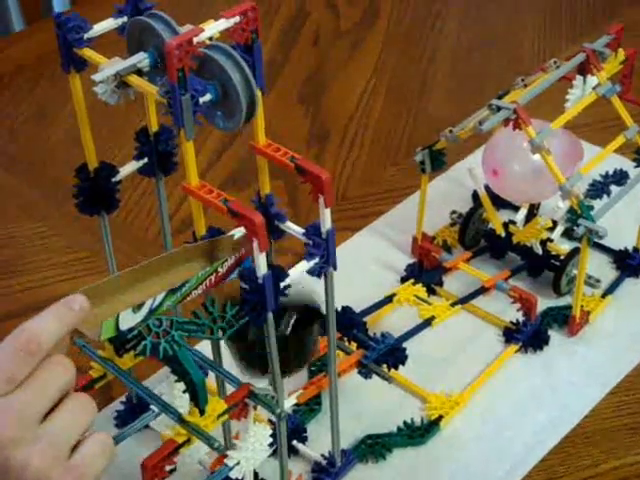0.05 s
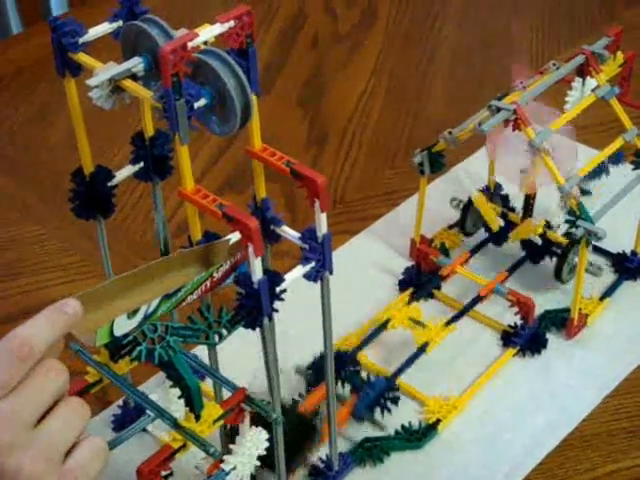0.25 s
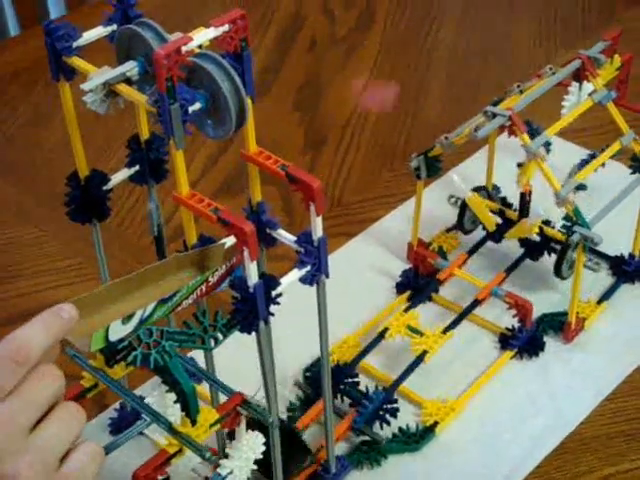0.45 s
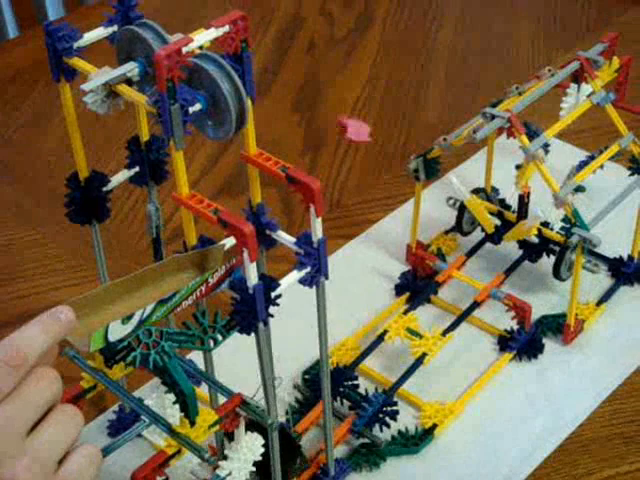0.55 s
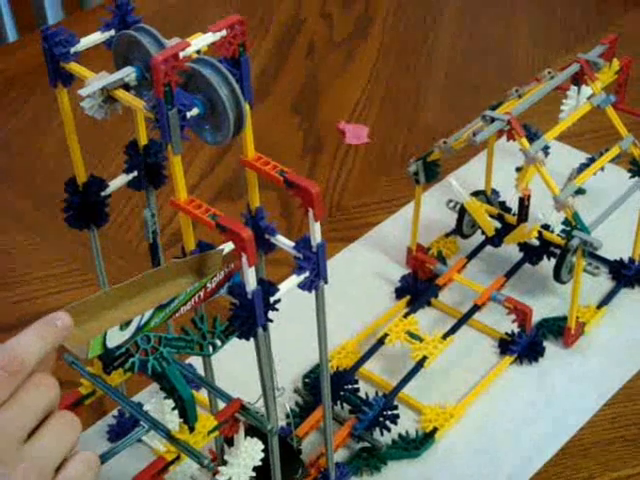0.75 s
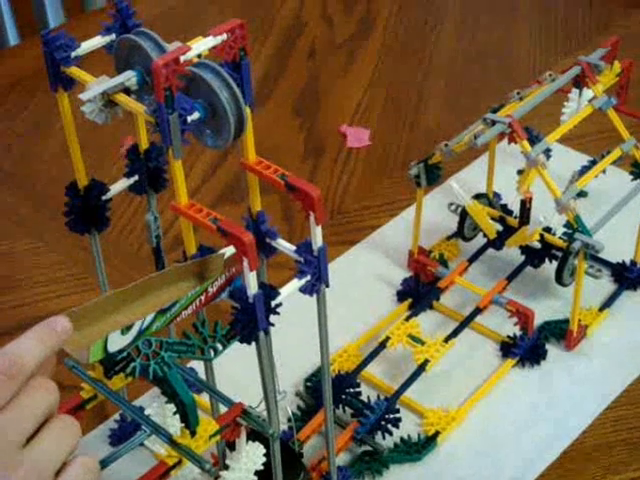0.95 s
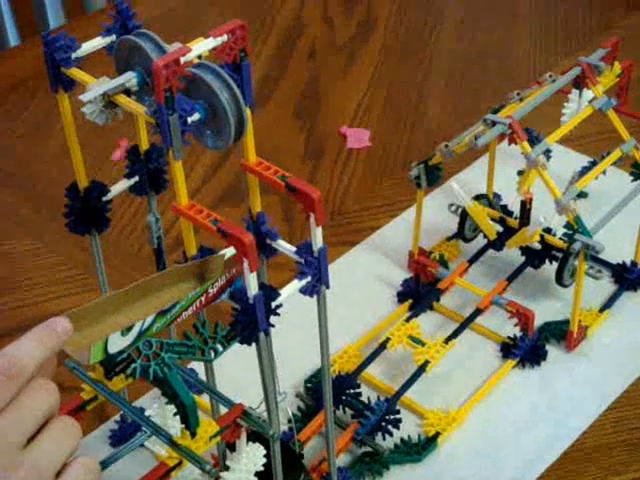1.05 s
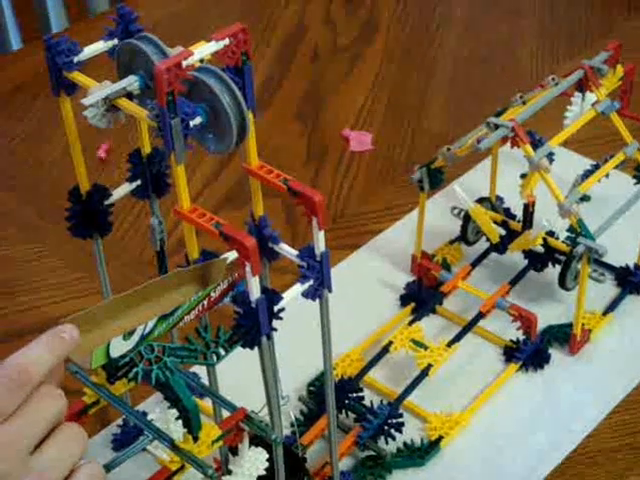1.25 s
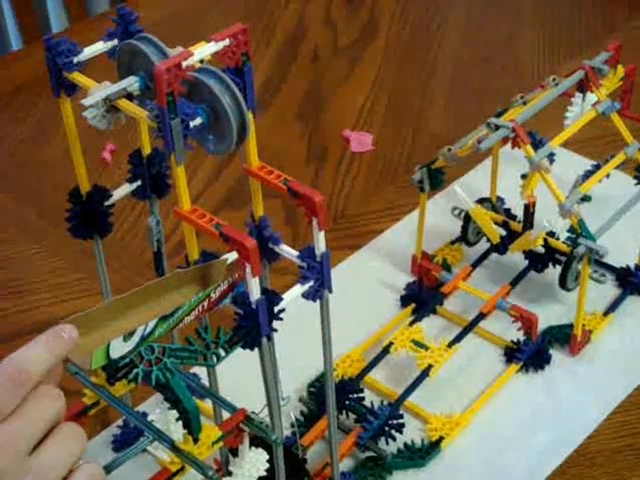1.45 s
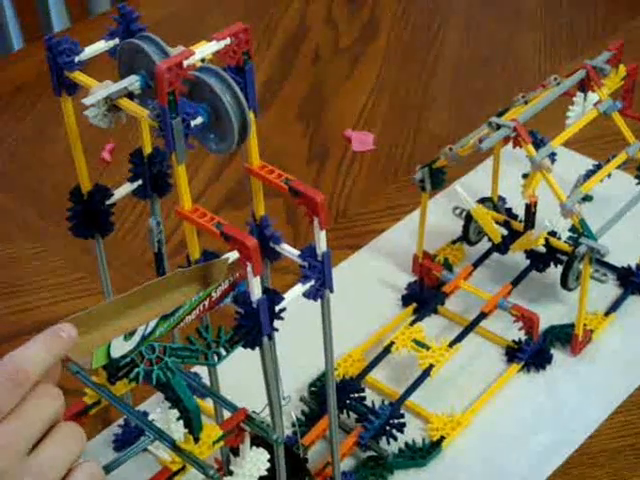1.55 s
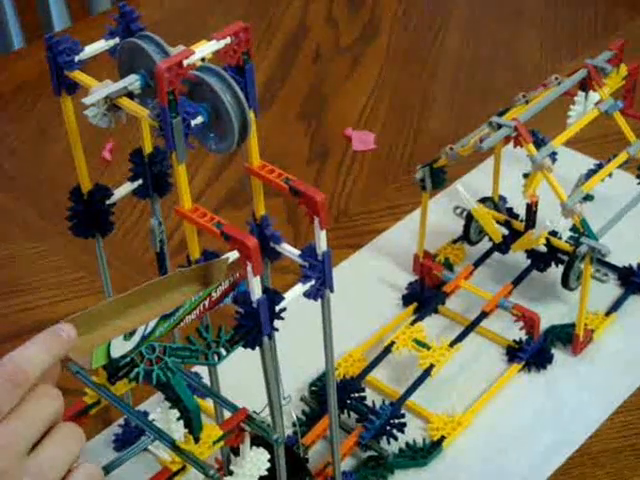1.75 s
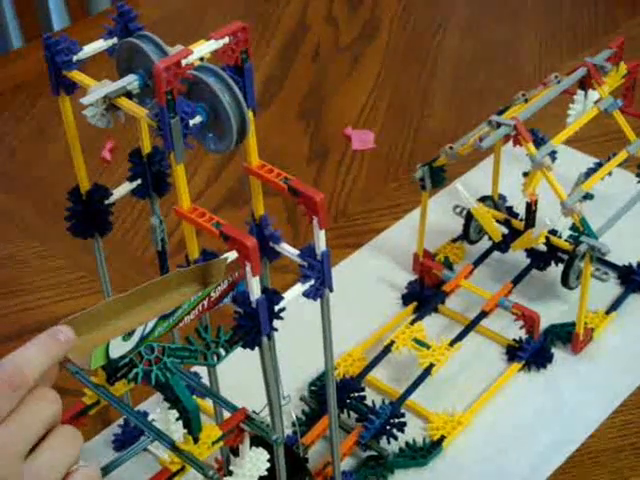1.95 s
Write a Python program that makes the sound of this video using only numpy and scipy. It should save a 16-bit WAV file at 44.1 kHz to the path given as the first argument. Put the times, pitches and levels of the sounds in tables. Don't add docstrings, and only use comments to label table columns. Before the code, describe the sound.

A small balloon bursts with a loud pop after a plastic bucket clatters down in a room

```python
import sys
import numpy as np
from scipy import signal
from scipy.fft import rfft, irfft, next_fast_len
from scipy.io import wavfile
from scipy.ndimage import uniform_filter1d

SR = 44100
rng = np.random.default_rng(int(sys.argv[2]) if len(sys.argv) > 2 else 0)


def rack_gain(trim_db):
    fader = np.asarray(trim_db, float)
    return 10 ** (fader / 20)


def output_pcm(signal):
    pcm = np.clip(np.atleast_2d(signal).T, -1, 1) * 32767
    wavfile.write(sys.argv[1], SR, np.round(pcm).astype(np.int16))


N = 88200
LOW_CUT_HZ = 450
WALL_S = 0.003
THUD_DB = -39.5
CRASH_RISE_S = 0.0025


def seconds(n):
    return np.arange(n) / SR


def noise(n):
    return rng.standard_normal(n)


def unit(x):
    return x / np.sqrt(np.mean(x ** 2) + 1e-20)


def along(points, hz):
    f, v = np.transpose(points)
    return np.interp(np.log(hz + 1), np.log(f + 1), v)


def filtered(x, response):
    m = next_fast_len(len(x) + 8192)
    hz = np.fft.rfftfreq(m, 1 / SR)
    return irfft(rfft(x, m) * response(hz), m)[:len(x)]


def coloured(x, points):
    return filtered(x, lambda hz: rack_gain(along(points, hz)))


def low_cut(x):
    return filtered(x, lambda hz: hz ** 2 / (hz ** 2 + LOW_CUT_HZ ** 2))


def narrow_noise(centre_hz, width_hz):
    return unit(filtered(noise(N), lambda hz: np.exp(-((hz - centre_hz) / width_hz) ** 2)))


def decay(t, t60_s):
    return rack_gain(-60 * t / t60_s)


def onset(t, rise_s):
    return 1 - np.exp(-t / rise_s)


def ring(modes, t, spread_db):
    total = np.zeros(len(t))
    for hz, db, t60_s in modes:
        level_db = db + spread_db * rng.standard_normal()
        total += rack_gain(level_db) * decay(t, t60_s) * np.sin(2 * np.pi * hz * t)
    return total


def add(track, start_s, sound):
    part = track[round(start_s * SR):][:len(sound)]
    part += sound[:len(part)]


# (frequency [Hz], t60 [s])
ROOM_T60 = [(150, 0.8), (400, 0.47), (1000, 0.58), (2500, 0.5), (6000, 0.55), (12000, 0.46)]


def tail():
    hz, t, z = signal.stft(noise(SR), SR, nperseg=256)
    t60_s = along(ROOM_T60, hz)[:, None]
    h = signal.istft(z * decay(t, t60_s), SR, nperseg=256)[1]
    return h / np.linalg.norm(h)


def room(x, wet_db):
    late = np.pad(x, (round(WALL_S * SR), 0))
    return x + rack_gain(wet_db) * signal.fftconvolve(late, tail())[:N]


# (frequency [Hz], level [dB])
AIR_COLOUR = [(20, -32), (60, -24), (118, -14), (190, -11.5), (280, -6), (900, -10), (3000, -19.5),
              (9000, -27), (13000, -27.5), (16000, -28.5)]
# (frequency [Hz], width [Hz], level [dB])
FRIDGE_LINES = [(128, 14, -53), (240.5, 8, -49.5), (332, 10, -59), (888, 8, -55.5)]


def air():
    air_db, fuzz = -44, 0.3
    z = signal.stft(noise(N + 512), nperseg=512)[2]
    patches = uniform_filter1d(rng.standard_normal(z.shape), 6, 0)
    patches = uniform_filter1d(patches, 10, 1)
    patchy = signal.istft(z * unit(rack_gain(unit(patches))), nperseg=512)[1][:N]
    out = rack_gain(air_db) * unit(coloured(patchy, AIR_COLOUR))
    for hz, width_hz, db in FRIDGE_LINES:
        tone = np.sin(2 * np.pi * hz * seconds(N))
        out += rack_gain(db) * (tone + fuzz * narrow_noise(hz, width_hz))
    return out


# (time [s], peak level [dB], treble [dB])
TICKS = [
    (.0003, -26, -10),
    (0.0136, -22.5, -10.5),
    (0.034, -24, -5),
    (.052, -27, -0.5),
    (.0664, -28, 0),
    (.0764, -31, 1.5),
    (.0868, -28, 0),
    (.1044, -37, -6),
    (.120, -51.5, 16.5),
    (.1324, -38, -5),
]
# (frequency [Hz], level [dB], t60 [s])
ROD = [(1436, 5.5, 0.011), (2290, -1, 0.019), (3650, 10.5, 0.0079), (4110, 10.5, 0.0073), (5380, 3, .006),
       (6660, -23, .006)]
# (time [s], level [dB])
RUMBLE = [
    (.05, -69),
    (.09, -43),
    (.135, -42),
    (0.192, -57),
]


def ticks():
    rise_s, crack_db, crack_t60_s = 0.001, -1.5, 0.026
    out, t = np.zeros(N), seconds(SR // 10)
    for start_s, db, treble_db in TICKS:
        crack = rack_gain(crack_db) * decay(t, crack_t60_s) * noise(len(t))
        body = ring(ROD[:1], t, 0.64)
        treble = ring(ROD[1:], t, 1.8) + crack
        knock = body + rack_gain(treble_db) * treble
        add(out, start_s, rack_gain(db - 3.5) * knock * onset(t, rise_s))
    roll_db = np.interp(seconds(N), *np.transpose(RUMBLE), right=-120)
    roll = narrow_noise(centre_hz=283, width_hz=91) * rack_gain(roll_db)
    return room(low_cut(out), wet_db=-3) + roll


# (frequency [Hz], level [dB])
TABLE_COLOUR = [(20, -1), (70, -4), (200, -22), (400, -45)]


def thud(db):
    t = seconds(SR // 2)
    return rack_gain(db) * decay(t, 0.46) * unit(coloured(noise(len(t)), TABLE_COLOUR))


def clatter(t60_s, colour):
    grains_per_s, spread_db, grain_t60_s = 2500, 5, 0.005
    t = seconds(SR // 2)
    struck = rng.random(len(t)) < grains_per_s / SR
    hits = struck * rack_gain(spread_db * noise(len(t)).clip(-2, 2))
    envelope = np.convolve(hits, decay(t[:400], grain_t60_s))[:len(t)]
    grains = envelope * noise(len(t))
    return unit(coloured(grains, colour)) * decay(t, t60_s) * onset(t, CRASH_RISE_S)


# (time [s], level [dB], clatter t60 [s], room level [dB])
LANDINGS = [
    (.2095, -10, 1, -1),
    (0.317, -6, 0.28, 1),
]
# (frequency [Hz], level [dB])
LANDING_COLOURS = [
    [(100, -33), (300, -17), (700, -6.5), (1900, -2.5), (3100, -5), (4200, -3.5), (8500, -4),
     (16000, -11.5)],
    [(100, -30), (400, -11.5), (540, -21), (750, -5), (1900, -0.5), (3100, -8.5), (5000, -5), (16000, -10)],
]
# (frequency [Hz], level [dB], t60 [s])
WALL_MODES = [
    [(365, 0, 0.078), (592, 2.5, 0.096), (846, -4, 0.063), (2390, -12, .03), (4156, 4, 0.053)],
    [(395, 0, 0.075), (709, 6, 0.031), (872, 3.5, 0.032), (1398, 1, 0.045), (1900, 2, .04),
     (4560, -7, 0.045)],
]
# (delay [s], level [dB], wall ring [dB])
ROCKS = [
    [(0, 0.5, -15), (.013, 3.5, -16), (.024, -2, 6.5), (.052, -5, -4), (.074, 2, -12)],
    [(0, 0.5, 3), (.007, -7.5, -4), (.016, -2, -5), (.036, 0.5, -9), (.05, -7.5, 4.5)],
]
# (frequency [Hz], level [dB], t60 [s])
PIN = [(6900, -4.5, 0.037), (8200, -2, .03)]


def bucket():
    wall_base_db, blow_db, blow_t60_s = -8, 4, 0.047
    total, t = np.zeros(N), seconds(SR // 2)
    rise = onset(t, CRASH_RISE_S)
    for landing, colour, modes, rocks in zip(LANDINGS, LANDING_COLOURS, WALL_MODES, ROCKS):
        start_s, db, t60_s, wet_db = landing
        out = np.zeros(N)
        add(out, start_s, rack_gain(db) * clatter(t60_s, colour))
        for delay_s, rock_db, wall_db in rocks:
            blow = rack_gain(blow_db) * decay(t, blow_t60_s) * unit(coloured(noise(len(t)), colour))
            wall = rack_gain(wall_base_db + wall_db) * ring(modes, t, 1)
            add(out, start_s + delay_s, rack_gain(db + rock_db) * (blow + wall) * rise)
        total += room(out, wet_db)
        add(total, start_s, thud(THUD_DB))
    add(total, LANDINGS[0][0], ring(PIN, t, 0) * rise)
    return total


# (frequency [Hz], level [dB], t60 [s])
BURST = [(2500, 4, .011), (1050, 0, .018)]
# (frequency [Hz], level [dB])
POP_COLOUR = [(100, -50), (250, -20.5), (400, -8.5), (800, -1.5), (1150, -3), (2100, -9.5), (3000, -15.5),
              (6000, -20.5), (16000, -23.5)]


def balloon():
    pop_s, pop_db, room_db, build_s = 0.4764, 10.5, 26, 0.0036
    out, t = np.zeros(N), seconds(SR // 20)
    add(out, pop_s, low_cut(-rack_gain(pop_db) * ring(BURST, t, 0)))
    add(out, pop_s, thud(THUD_DB - 3))
    answer = coloured(tail(), POP_COLOUR)
    answer = answer / np.linalg.norm(answer)
    build = onset(seconds(len(answer)), build_s)
    add(out, pop_s + WALL_S / 2, rack_gain(pop_db + room_db) * build * answer)
    return out


# (time [s], level [dB], t60 [s])
SETTLE = [
    (.790, -21, 0.086),
    (0.921, -35, 0.11),
]
# (frequency [Hz], level [dB])
SETTLE_COLOUR = [(300, -30), (1000, -3.5), (3000, -9), (5000, -8), (9000, -12), (16000, -15)]


def parts():
    out = np.zeros(N)
    for start_s, db, t60_s in SETTLE:
        add(out, start_s, rack_gain(db) * clatter(t60_s, SETTLE_COLOUR))
    return room(out, wet_db=-4.5)


def scene():
    return (ticks() + bucket() + balloon() + parts() + air())[None]


# (frequency [Hz], level [dB])
MIC = [(9000, 1), (10200, -8), (12000, -10.5), (13500, -8.5), (15700, -6), (16000, -66), (16700, -120)]


def microphone(x):
    return coloured(x, MIC)


# (time [s], level [dB])
GAIN = [(0, 0.5), (.2, 0.5), (.22, -4), (.3, -4.5), (.33, -1.5), (.47, -10.5), (.55, -5.5), (.65, -6.5),
        (.78, -8.5), (.9, -8), (1.1, -3.5), (1.4, -1.5), (2, 0.5)]


def slow_gain(x):
    return x * rack_gain(np.interp(seconds(N), *np.transpose(GAIN)))


def trailing_mean(x, length_s):
    return uniform_filter1d(x, round(length_s * SR), origin=round(length_s * SR / 2) - 2)


def limiter(x):
    sense_s, smooth_s, limit_db = 0.009, 0.007, -9
    clip, knee = 1.05, 5.1
    level = np.sqrt(abs(trailing_mean(x ** 2, sense_s)) + 1e-12)
    x = x * trailing_mean(np.minimum(1, rack_gain(limit_db) / level), smooth_s)
    return x / (1 + abs(x / clip) ** knee) ** (1 / knee)


# (end [s], length [s], low edge [Hz], high edge [Hz], level [dB])
DROPOUTS = [
    (.207, .014, 1300, 17000, -25),
    (.316, .01, 300, 17000, -6),
    (.316, .012, 5500, 17000, -8),
    (.475, .03, 5200, 7500, -12),
    (.472, .027, 2400, 3500, -14),
    (.475, .015, 9000, 17000, -6),
    (.789, .022, 5500, 9500, -9),
    (.115, .02, 4700, 7000, -10),
]


def dropouts(x):
    t = seconds(N)
    for end_s, length_s, low_hz, high_hz, db in DROPOUTS:
        gate = uniform_filter1d(1. * ((t > end_s - length_s) & (t < end_s)), size=80)
        band = filtered(x, lambda hz: (hz > low_hz) & (hz < high_hz))
        x = x - (1 - rack_gain(db)) * gate * band
    return x


def roll_off(x):
    return signal.sosfilt(signal.butter(12, 16650, fs=SR, output="sos"), x)


def record(dry):
    x = slow_gain(microphone(dry[0]))
    x = dropouts(limiter(x))
    x = filtered(x, lambda hz: hz < 16650)
    return roll_off(x[None])


dry = scene()
out = record(dry)
output_pcm(out)
```